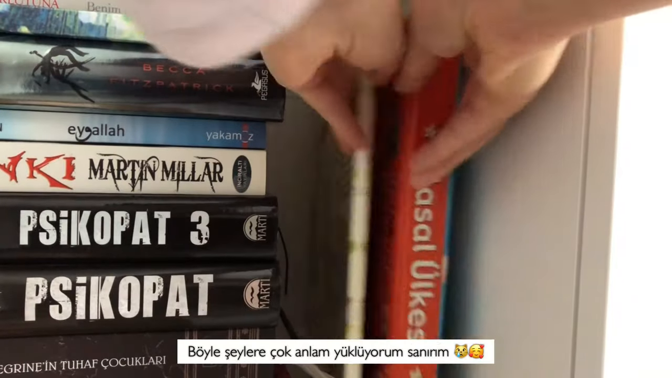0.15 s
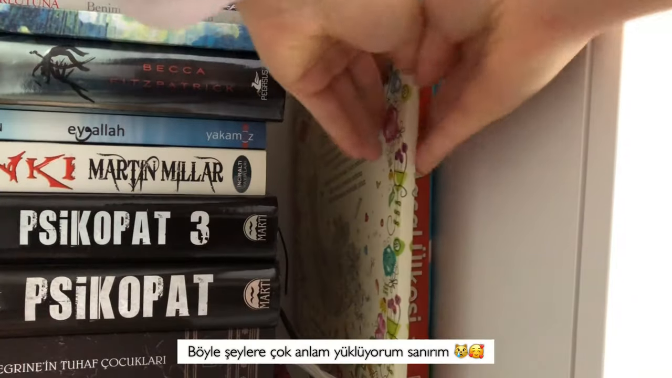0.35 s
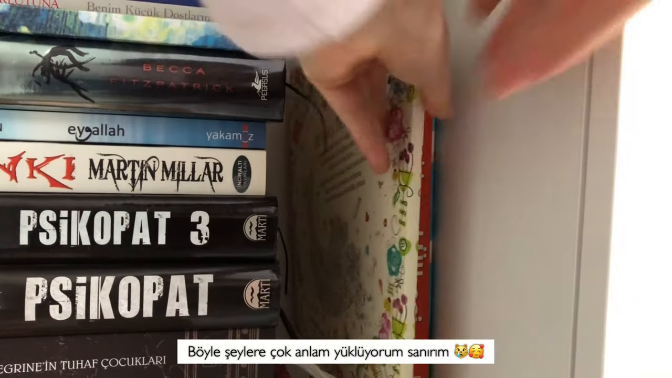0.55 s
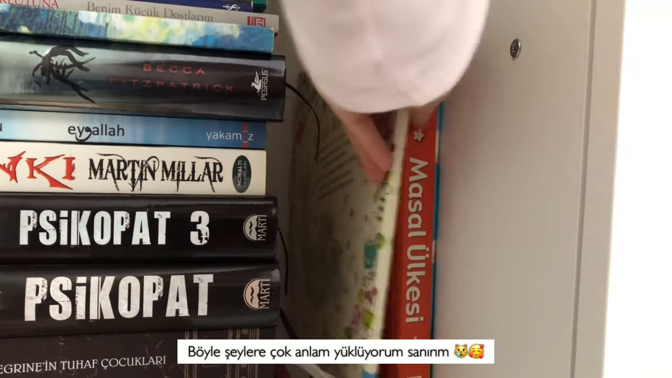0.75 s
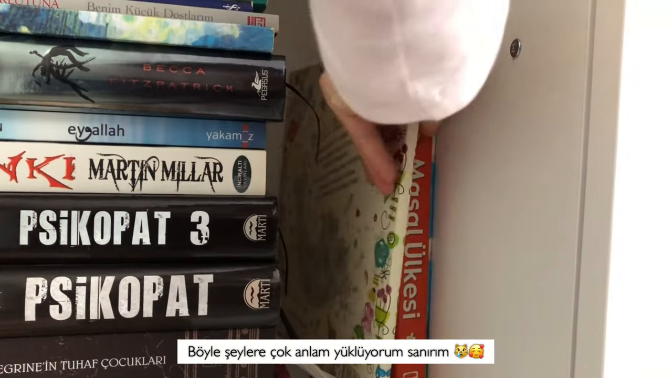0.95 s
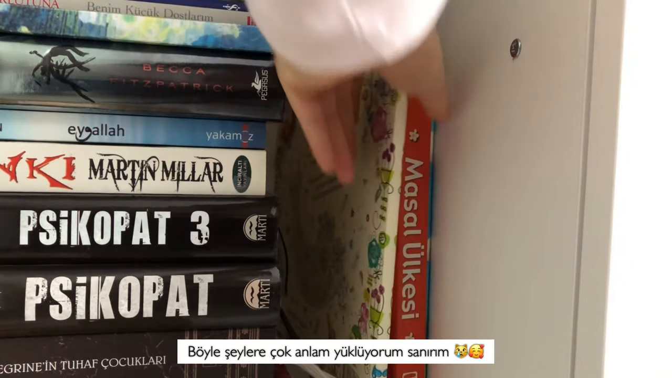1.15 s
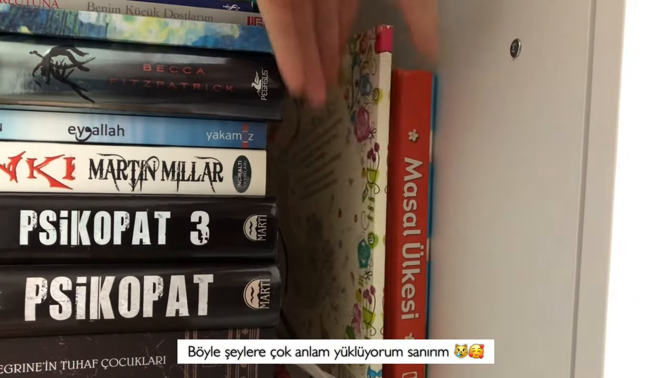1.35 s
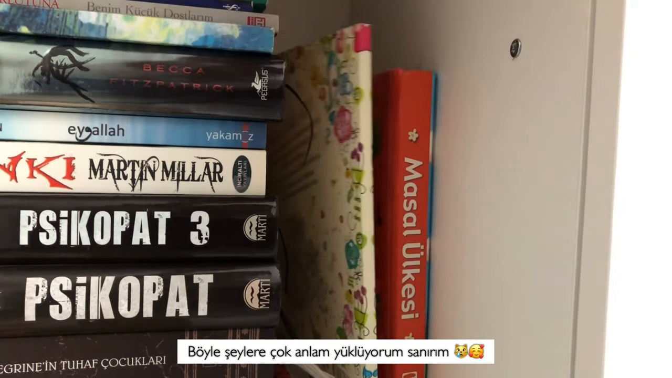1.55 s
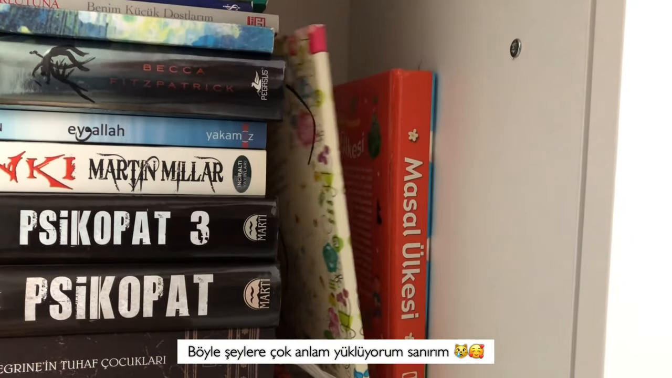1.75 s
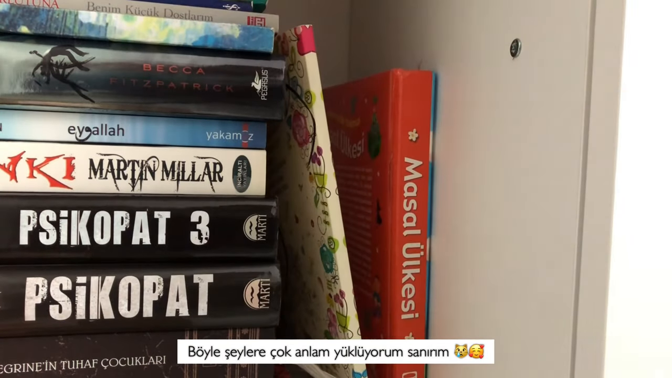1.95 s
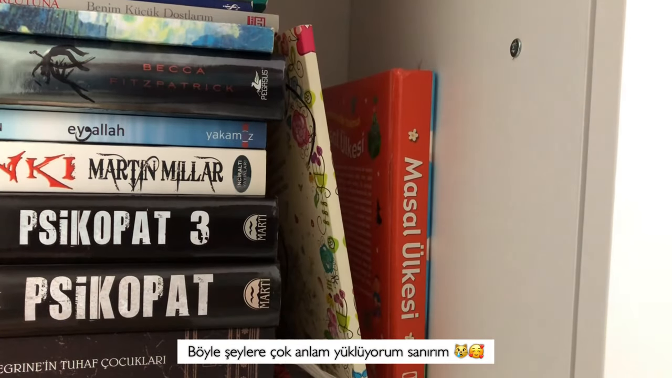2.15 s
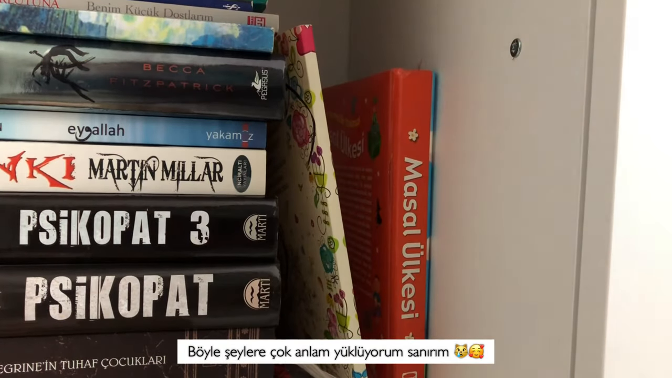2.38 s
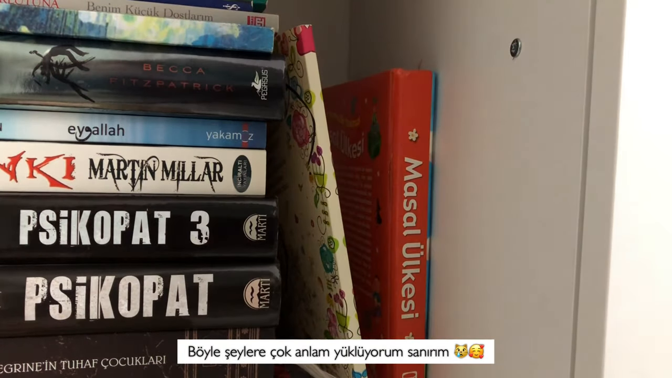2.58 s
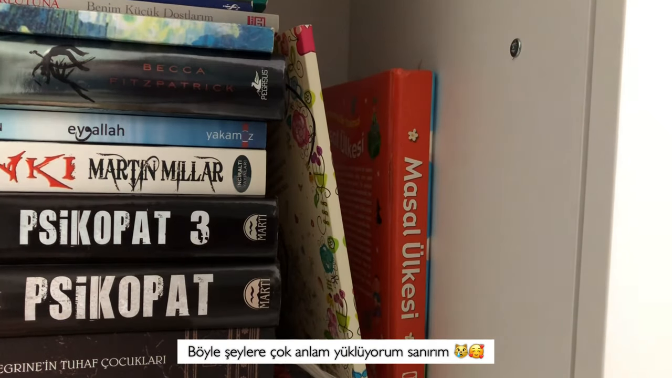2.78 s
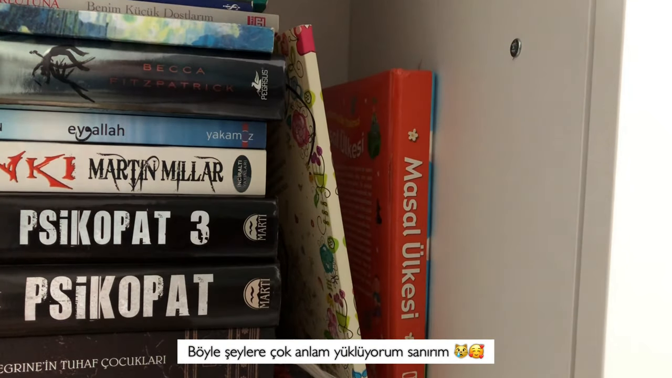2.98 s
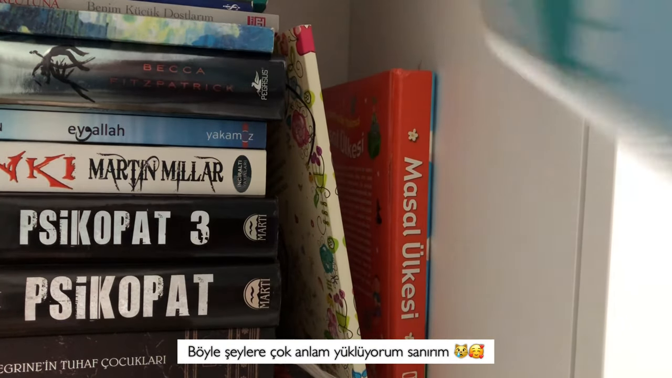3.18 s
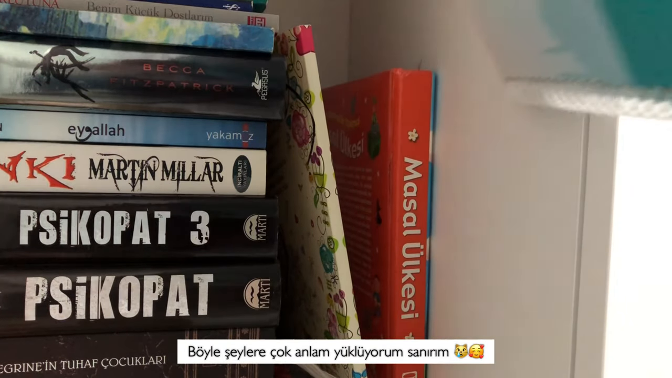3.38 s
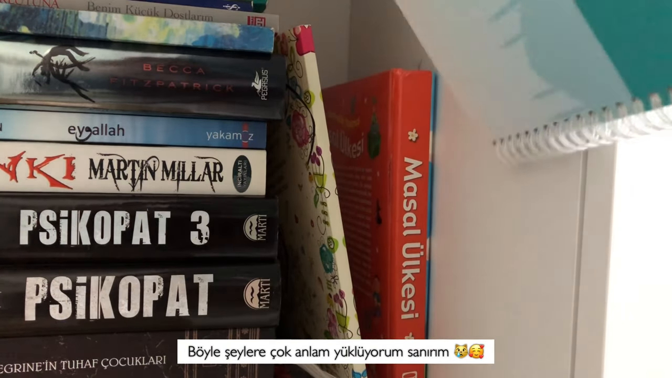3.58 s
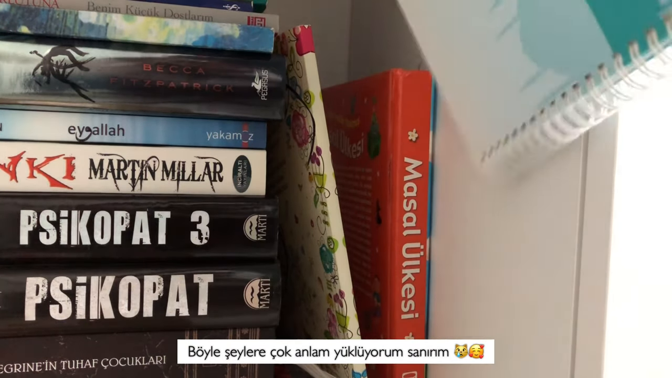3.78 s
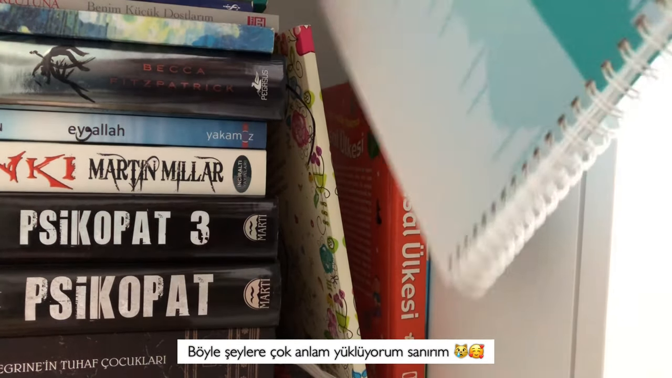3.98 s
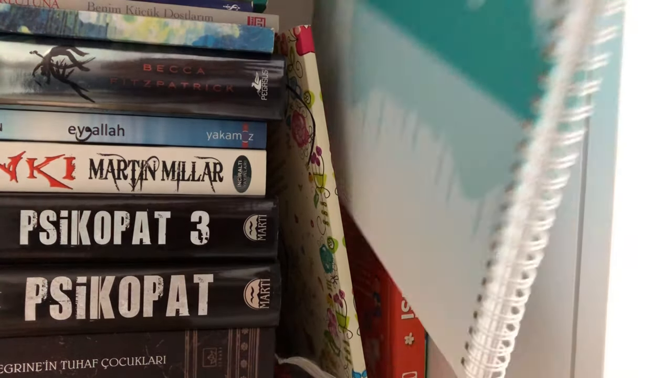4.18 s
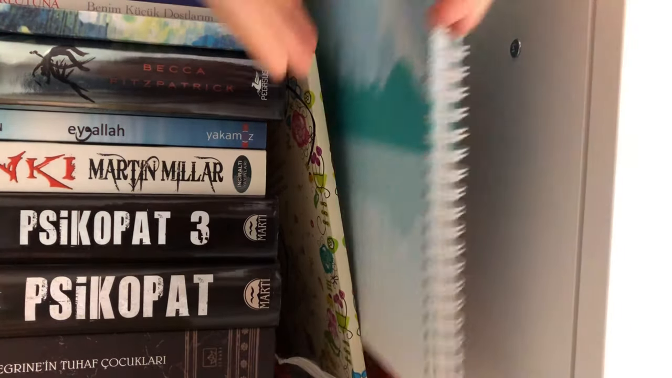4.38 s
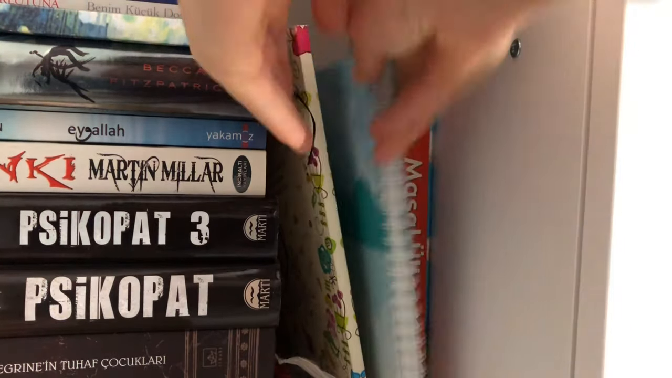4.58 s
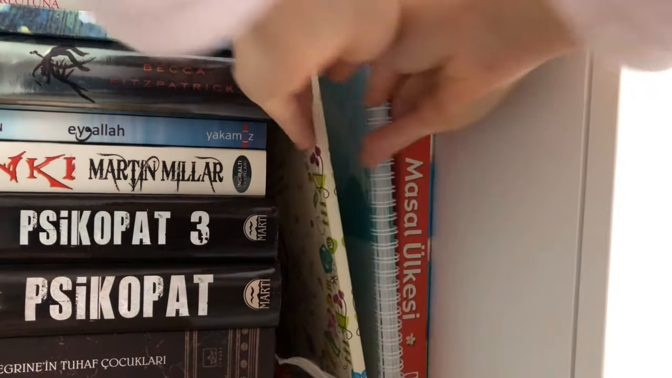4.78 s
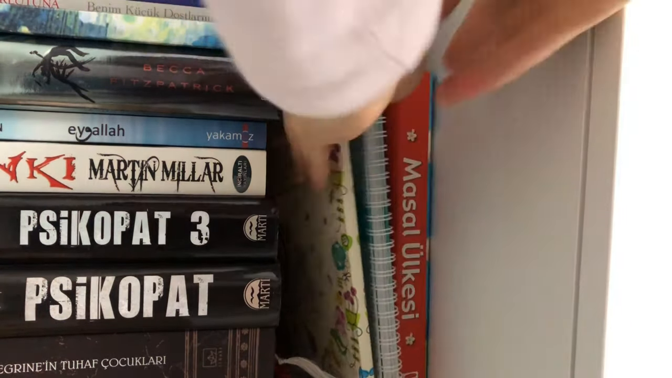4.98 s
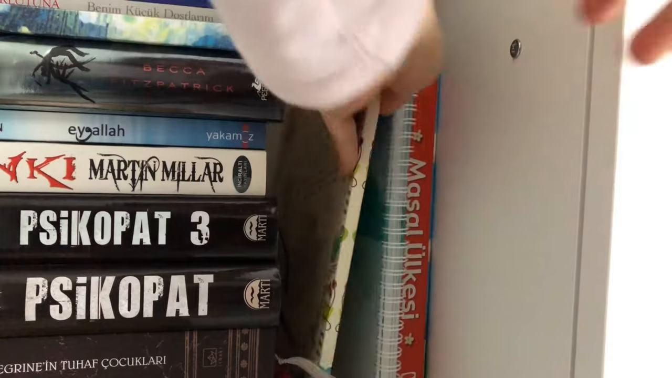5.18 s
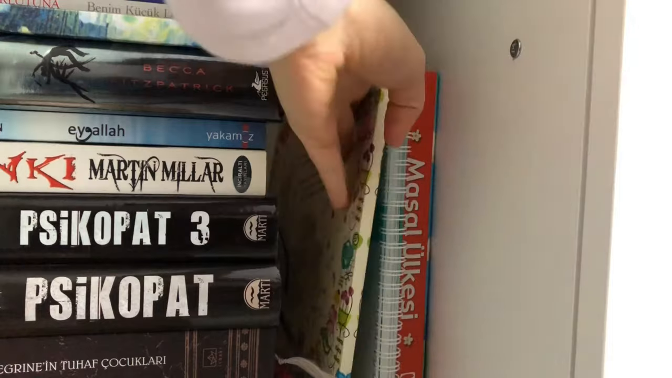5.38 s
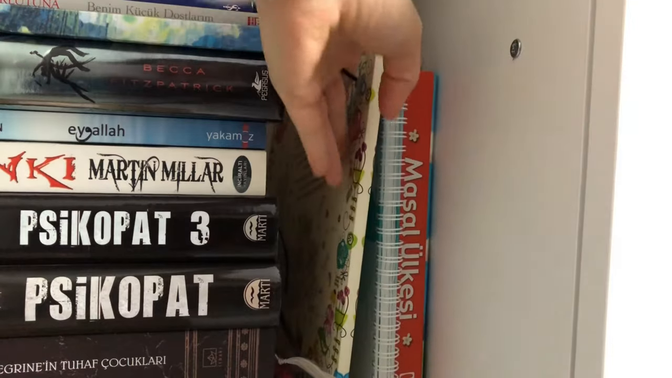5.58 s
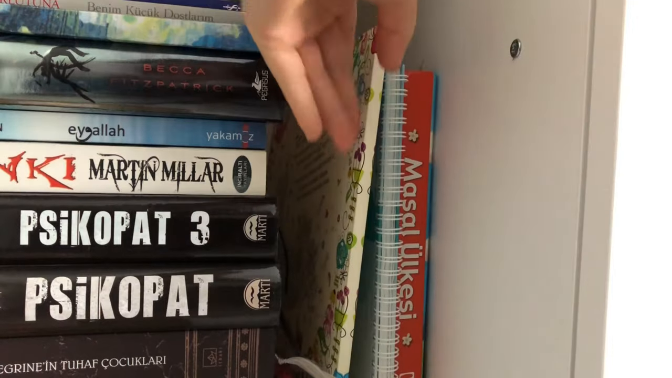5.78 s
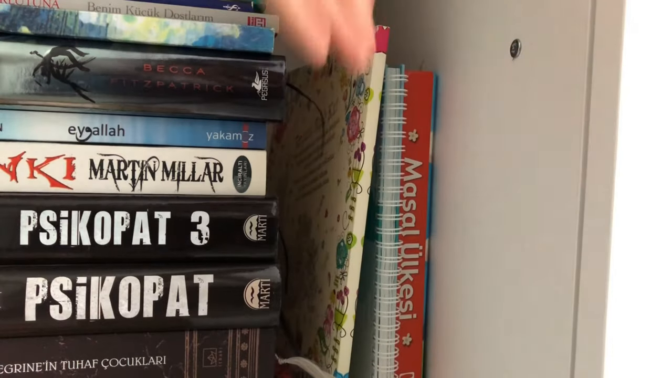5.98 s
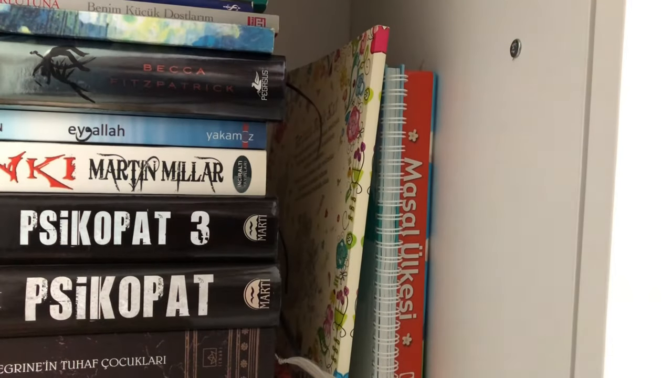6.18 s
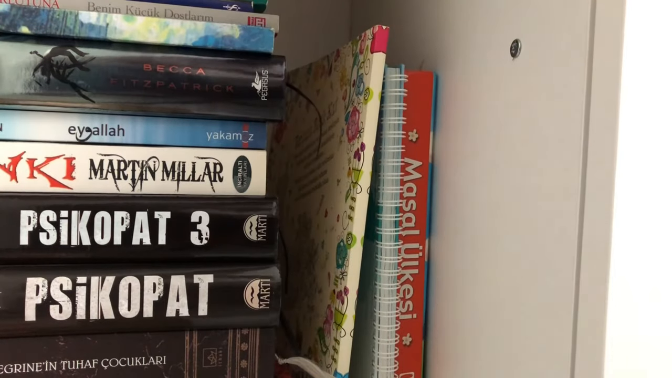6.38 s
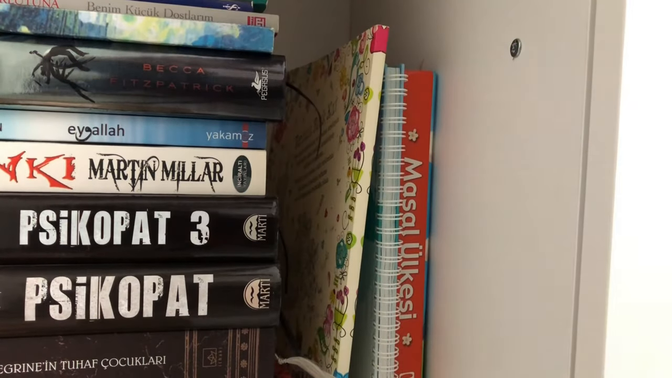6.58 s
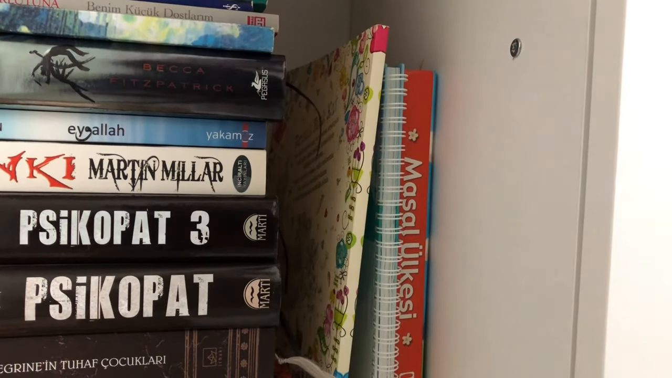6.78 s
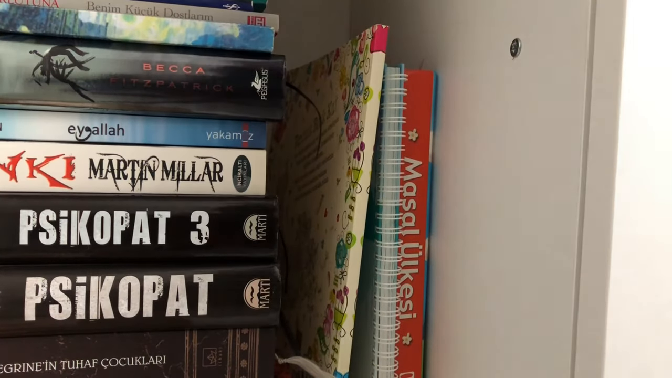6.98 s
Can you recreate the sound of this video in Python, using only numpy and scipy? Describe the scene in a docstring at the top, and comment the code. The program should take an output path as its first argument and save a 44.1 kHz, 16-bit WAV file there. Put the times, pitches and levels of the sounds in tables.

```python
"""Two picture books and a wire-bound notebook are pushed into a wooden bookcase, close by in a small room.
First glossy covers slide and crackle, fingers tick on card and book edges knock on the boards.
Just after 3 s the wire binding shimmers and clicks against the side wall. At 4.5 s the notebook drops
onto the shelf with three blows that overload the microphone. Lighter knocks and a flurry of ticks follow,
then soft slides and one last brush of a cover, over the low background of the home."""
import sys
import numpy as np
from scipy import signal
from scipy.fft import rfft, irfft
from scipy.io import wavfile

SR = 44100
rng = np.random.default_rng(int(sys.argv[2]) if len(sys.argv) > 2 else 0)


def transcribe(signal):
    """Save signal, clipped to [-1, 1], as a 16-bit WAV file at the path in sys.argv[1]."""
    frames = np.atleast_2d(signal).T
    limited = np.clip(frames, -1, 1)
    pcm = np.round(limited * 32767).astype(np.int16)
    wavfile.write(sys.argv[1], SR, pcm)


N = 310464
TIME = np.arange(N) / SR
AGE = TIME[:SR]  # seconds since a contact


def undb(db):
    """Decibels to gain."""
    return 10 ** (np.asarray(db) / 20)


def unit(x):
    """Scale to rms 1."""
    return x / np.sqrt(np.mean(x ** 2))


def on_log_axis(hz, points):
    """Read (freq_hz, value) points along a log-frequency axis."""
    freq_hz, value = np.transpose(points)
    return np.interp(np.log(hz + 1e-9), np.log(freq_hz), value)


def colour(x, eq):
    """Shape a steady signal with an EQ curve, at rms 1."""
    gain = undb(on_log_axis(np.fft.rfftfreq(len(x), 1 / SR), eq))
    return unit(irfft(rfft(x) * gain, len(x)))


def noise(eq, length=SR):
    """Noise shaped by an EQ curve, at rms 1."""
    return colour(rng.standard_normal(length), eq)


def resonate(x, hz, width_hz):
    """Two-pole band-pass, gain 1 at the centre."""
    hz, width_hz = min(hz, SR * .45), min(width_hz, SR * .4)
    return signal.lfilter(*signal.iirpeak(hz, hz / width_hz, SR), x)


def fade(t60_s):
    """Exponential decay from a contact."""
    return np.exp(-np.log(1000) * AGE / t60_s)


def ring(hz, t60_s):
    """One struck mode."""
    return np.sin(2 * np.pi * hz * AGE) * fade(t60_s)


def add(out, start_s, sound):
    """Mix a sound in at a time."""
    start = int(np.clip(start_s * SR, 0, N - 1))
    out[start:start + len(sound)] += sound[:N - start]


def wander(rate_hz):
    """Smooth random drift, spread near 1."""
    points = rng.standard_normal(N // 100)
    return np.interp(TIME * rate_hz, np.arange(len(points)), points)


# Modes of the bookcase: pitch_hz, level_db, t60_s
SHELF_MODES = [(142.8, 1.5, 0.22), (183.4, 1.5, 0.15), (233, -16.5, 0.4), (276.8, -4, 0.14),
               (329.3, 0.5, 0.15), (398, -3.5, 0.14), (535, 2, 0.036), (540.7, -6, 0.15),
               (598.7, 0.5, 0.08), (725, 0, 0.041), (792, -11, 0.12), (914, -16, 0.037),
               (1130, -6.5, 0.047), (1286, -13, 0.034), (1390, -17, 0.16)]
# Tone of clacking covers: freq_hz, gain_db
CLACK_EQ = [(100, 1.5), (300, 13.5), (650, 8.5), (1100, 2.5), (1500, 2.5), (2100, -9), (3000, -6.5),
            (6000, -23.5), (14000, -22)]
# Tone of the booming case: freq_hz, gain_db
BOOM_EQ = [(20, -25.5), (40, -24), (65, 5.5), (100, -4.5), (150, -11), (250, -15.5), (500, -24),
           (2000, -84)]
# Book edges hitting the boards: start_s, level_db, pitch_hz, clack_db, shelf_ring_db
BOOK_KNOCKS = [(.081,-21.5,336,-27,2.5), (.142,-4,214,-51,-2), (.164,-22,220,-22,-3),
               (0.205,-2.5,170,-31,-34), (.276,-22,300,-28.5,-7), (0.308,-13.5,164,-51,-7),
               (0.781,-15.5,182,-55,-14.5), (0.8249,-7.5,656,-29.5,-26), (.826,-5.5,158,-38,-7.5),
               (.858,-7.5,83.4,-54,-10), (.924,-16,152,-47,-15), (1.6,-26,510,-55,-4.5),
               (1.798,-28.5,149,-41,-1.5), (2.025,-11.5,684,-41.5,-30), (2.037,-25.5,560,-46,-12),
               (2.085,-26,680,-46.5,-21), (3.0741,-4.5,545,-32,-21), (3.076,6,207,-27,-20),
               (3.186,-15.5,228,-27.5,-6), (3.711,-14,199,-36,-12.5), (3.737,-23,323,-34,-4),
               (3.78,-8,278,-34,-8), (3.861,-27,336,-30,1.5), (3.873,-18.5,404,-30,-4),
               (3.892,1.5,193,-25.5,-7), (3.957,-16,210,-33.5,-6.5), (4.396,-39,615,-30.5,-6),
               (4.5081,14,204.7,-4.5,-8), (4.533,0,200,-31.5,-1), (4.6204,9,616,-10.5,-4),
               (4.631,1.5,206,-25,-8), (4.657,-4,318,-37.5,-5), (4.7119,7,230,-12,-7),
               (4.7555,-6.5,456,-23.5,-4.5), (5.146,-21.5,338,-21.5,-4), (5.159,-12,267,-22.5,-2),
               (5.178,-16,296,-26.5,-6), (5.208,-1.5,201,-32,-12.5), (5.259,-10,146,-31,-19),
               (5.299,-19,149,-34,-2), (6.959,-21,600,-37,-8)]
def knocks(book_hz=200, book_t60_s=.055, push_s=.0021, boom_rise_s=.016, boom_limit_db=-11):
    """Each blow rings the book and the shelf; the covers clack and the whole case booms a little later."""
    out = np.zeros(N)
    low_cut = signal.butter(2, 62, "high", fs=SR)  # a small board radiates little deep bass
    for start_s, level_db, pitch_hz, clack_db, shelf_ring_db in BOOK_KNOCKS:
        t60_s = book_t60_s * (book_hz / pitch_hz) ** .48  # higher rings die sooner
        book = ring(pitch_hz, t60_s) * (1 - np.exp(-AGE / push_s))
        shelf = 0
        for k, (mode_hz, mode_db, mode_t60_s) in enumerate(SHELF_MODES):
            # a soft, low blow stays in contact too long to reach the high modes
            drive = min(mode_hz / pitch_hz, 1) / (1 + (mode_hz / (2.3 * pitch_hz)) ** 2)
            shelf += (-1) ** k * undb(mode_db) * drive * ring(mode_hz, mode_t60_s)
        wood = undb(level_db) * signal.lfilter(*low_cut, book + undb(shelf_ring_db - 3) * shelf)
        clack = undb(clack_db + 2.5) * noise(CLACK_EQ) * (fade(.061) + undb(4) * fade(.014))
        boom = noise(BOOM_EQ) * fade(.45) * (1 - np.exp(-AGE / boom_rise_s))
        # harder, lower blows boom more, up to the heavy case's limit
        boom_db = min(-21 + .74 * level_db - 4 * np.log2(pitch_hz / book_hz), boom_limit_db)
        add(out, start_s, bend(wood + clack, travel_s=.00906) + undb(boom_db) * boom)
    return out


def bend(x, travel_s, stiff_hz=1300):
    """Bending waves in a board: below stiff_hz the lows arrive late; travel_s is their trip at 100 Hz."""
    hz = np.minimum(np.fft.rfftfreq(2 * len(x), 1 / SR), stiff_hz)
    turns = 10 * travel_s * (2 * np.sqrt(hz) - hz / np.sqrt(stiff_hz))
    return irfft(rfft(x, 2 * len(x)) * np.exp(-2j * np.pi * turns))[:len(x)]


# Tone of sliding gloss: freq_hz, gain_db
HISS_EQ = [(800, -16), (2000, -2.5), (3500, 1.5), (5500, 1), (8000, -0.5), (11000, 2), (15000, 7)]
# Tone of rasping card: freq_hz, gain_db
RASP_EQ = [(100, 7.5), (250, 7), (450, 3), (650, 6), (950, 1.5), (1600, 2.5), (2800, -8), (5000, -23),
           (9000, -38.5)]
# Strokes of a cover or sleeve over a surface: peak_s, rise_s, fall_s, hiss_db, bright_db, rasp_db
COVER_STROKES = [(.12,0.33,0.12,-29.5,-4,-42.5), (.17,0.0088,0.046,-20.5,-4.5,-55),
                 (.25,.05,0.1,-27.5,-4,-39), (.54,0.065,0.12,-45.5,-2,-51.5), (.72,0.051,0.14,-32,-4,-43),
                 (.795,0.034,0.064,-28,-5,-37.5), (.9,0.024,0.025,-28.5,-5,-47),
                 (1.05,0.042,0.044,-33,1,-46.5), (1.16,0.011,0.028,-34,-5,-43),
                 (1.4,0.29,0.75,-53.5,-10,-49.5), (1.71,0.16,0.085,-40,-4,-41),
                 (1.91,0.064,0.037,-49,-9,-40.5), (2.035,0.0061,0.047,-38.5,-1,-48),
                 (2.142,0.0088,0.013,-31.5,-7,-41), (2.2,0.073,0.087,-43,-2,-51),
                 (2.31,0.06,0.063,-32.5,-9,-40.5), (2.45,0.19,0.15,-58,-13,-50),
                 (3.145,0.028,0.029,-34.5,-10,-33), (3.55,0.027,0.11,-47,-10,-46),
                 (3.665,.03,0.015,-38,-8,-40), (3.785,.085,0.065,-31.5,-0.5,-38.5),
                 (3.95,0.12,0.15,-38.5,-7,-44.5), (4.35,0.043,0.064,-40,-7.5,-55),
                 (4.42,0.013,.045,-27,1.5,-32.5), (4.6,0.12,0.14,-33.5,-1,-30),
                 (4.83,0.05,0.039,-31,-13,-36), (5.0,0.38,0.45,-35,-5.5,-41.5),
                 (5.155,0.015,0.032,-26.5,2,-30), (5.28,0.023,0.063,-40,6,-46),
                 (5.52,0.069,0.039,-36,-7,-47), (5.98,.27,0.34,-47.5,-7,-57.5), (6.32,.1,0.1,-42.5,-21,-51),
                 (6.57,0.15,0.11,-40,-1,-53), (6.9,0.23,.2,-51.5,-8,-52.5),
                 (6.975,0.017,0.072,-38.5,-16,-47), (7.033,0.0053,.04,-17.5,-17,-60)]
def sliding(gain_db=1, split_hz=8500, resting_hiss_db=-59, resting_rasp_db=-66):
    """Glossy covers hiss as they slide, brighter when they barely touch; under pressure the card rasps."""
    dull_power, bright_power = undb(resting_hiss_db) ** 2, 0
    rasp_power = undb(resting_rasp_db) ** 2
    for peak_s, rise_s, fall_s, hiss_db, bright_db, rasp_db in COVER_STROKES:
        power = swell(peak_s, rise_s, fall_s) ** 2
        tilt = undb(bright_db) ** 2
        surface_power = power * undb(hiss_db) ** 2 * 2 / (1 + tilt)
        dull_power += surface_power
        bright_power += tilt * surface_power
        rasp_power += power * undb(rasp_db) ** 2
    gloss = colour(friction(grain_db=-7.5, catches_per_s=830, grip_db=2.5), HISS_EQ)
    hiss = moving_contact(gloss)
    dull = signal.sosfiltfilt(signal.butter(2, split_hz, fs=SR, output="sos"), hiss)
    bright = hiss - dull
    rasp = colour(friction(grain_db=-8, catches_per_s=300, grip_db=4), RASP_EQ)
    mix = np.sqrt(dull_power) * dull + np.sqrt(bright_power) * bright + np.sqrt(rasp_power) * rasp
    return undb(gain_db) * mix


def swell(peak_s, rise_s, fall_s, edge_db=-9, roundness=1.35):
    """Envelope of one hand movement: it speeds up, peaks and slows down."""
    away = np.maximum((peak_s - TIME) / rise_s, (TIME - peak_s) / fall_s)
    return np.where(away < 4, undb(edge_db * away ** roundness), 0)


def friction(grain_db, catches_per_s, grip_db):
    """Countless tiny slips, a few of them much larger, under a wavering grip."""
    smooth = rng.standard_normal(N)
    catches = (rng.random(N) < catches_per_s / SR) * rng.standard_normal(N)
    catches *= undb(2.9 * np.minimum(rng.exponential(size=N), 4))
    return (smooth + undb(grain_db) * unit(catches)) * undb(grip_db * wander(70))


def moving_contact(hiss, bands_hz=(2620, 4220, 6500, 9800), depth_db=2.5):
    """Resonances come and go in the hiss as the patch of contact moves."""
    shifts = sum(resonate(hiss, hz, .24 * hz) * (undb(depth_db * wander(16)) - 1) for hz in bands_hz)
    return unit(hiss + shifts)


# Fingers and card edges snapping: start_s, level_db, pitch_hz
CARD_TICKS = [(0.077,-16.5,4500), (0.164,-2.5,6000), (0.2147,-6.5,5500), (0.3534,-15.5,6760),
              (.431,-10,5860), (.713,-19.5,5000), (0.7887,-16,7000), (.7942,-10,7850), (0.9819,-17.5,6300),
              (1.042,-11,8100), (1.088,-17.5,6900), (1.1048,-13,12800), (1.1508,-10,10400),
              (1.2396,-18.5,9350), (1.331,-34,12300), (2.0275,-25,9000), (3.0727,-23,3120),
              (3.6886,-20.5,2930), (4.3962,-16.5,2180), (4.5076,5,2820), (4.612,-14,5470),
              (5.0643,-18,4770), (5.1431,-8,4280), (5.1576,-3.5,10000), (5.184,-11.5,5500),
              (5.378,-9.5,10600), (5.4065,-17.5,11000), (5.4287,-15,4050), (5.4522,-12,9300),
              (5.4761,-8.5,10200), (5.4803,-6,11100), (5.5062,-7.5,6700), (5.5357,-11,10430),
              (5.5443,-11,3030), (5.627,-27,11300), (5.865,-23.5,10630), (5.9227,-28,12270),
              (6.438,-24.5,2620)]
def ticks(gain_db=1, scratch_db=-12, rebound_db=-13, snap_hz=12800):
    """A card edge lets go with one sharp snap, a flutter of tiny rebounds and a brief scratch."""
    out = np.zeros(N)
    for start_s, level_db, pitch_hz in CARD_TICKS:
        scratch_t60_s = .02 * 5000 / pitch_hz  # smaller edges scratch for less time
        force = undb(scratch_db) * rng.standard_normal(SR) * fade(scratch_t60_s)
        force[0] = 2  # the edge lets go
        width_hz = 1.63 * pitch_hz
        card = resonate(resonate(force, pitch_hz, width_hz), pitch_hz, width_hz)
        rebounds = undb(rebound_db) * rng.standard_normal(SR) * fade(.005)
        snap = resonate(signal.unit_impulse(SR) + rebounds, snap_hz, width_hz=5500)
        snap_gain = undb(-3) * pitch_hz / snap_hz  # the smaller the edge, the more of it is pure snap
        tick = card / np.abs(card).max() + snap_gain * snap / snap.max()
        add(out, start_s, undb(level_db + gain_db) * tick)
    return out


# Resonances of wire and cover: pitch_hz, width_hz, level_db
BINDING_MODES = [(1280, 470, 15), (2340, 950, 9), (5600, 2500, 5.5), (6760, 470, 14.5), (7440, 260, -4),
                 (14500, 4100, 8)]
# The binding tapping the side wall: start_s, level_db
BINDING_TAPS = [(3.2968, -5), (3.3699, -19), (3.4963, -14.5)]
def wire_taps(tail_db=-23, wall_hz=107, wall_db=-13, clack_db=-17):
    """The wire loops chatter against the wall and ring on faintly; the wall answers with a soft knock."""
    out = np.zeros(N)
    for start_s, level_db in BINDING_TAPS:
        chatter = rng.standard_normal(SR) * (fade(.021) + undb(tail_db) * fade(.22))
        tap = sum(undb(db) * resonate(chatter, hz, width_hz) for hz, width_hz, db in BINDING_MODES)
        knock = undb(wall_db) * ring(wall_hz, .11)
        clack = undb(clack_db) * noise(CLACK_EQ) * fade(.088)
        wall = bend(knock + clack, travel_s=.0099)
        add(out, start_s, undb(level_db) * (tap / np.abs(tap).max() + wall))
    return out


# Glossy covers peeling apart: start_s, end_s, cracks_per_s, level_db
COVER_PEELS = [(.08, .378, 130, -17), (0.961, 1.139, 110, -20.5), (3.702, 3.822, 150, -21),
               (5.436, 5.56, 70, -17)]
def crackle(scatter_db=4, lowest_hz=3000, octaves=2.6, crack_t60_s=.00079):
    """Laminate clings and parts in tiny cracks of every size and pitch."""
    out = np.zeros(N)
    for start_s, end_s, cracks_per_s, level_db in COVER_PEELS:
        length_s = end_s - start_s
        for when, pitch, size in rng.random((int(cracks_per_s * length_s), 3)):
            crack = ring(lowest_hz * 2 ** (octaves * pitch), crack_t60_s)
            add(out, start_s + when * length_s, undb(level_db + scatter_db * (2 * size - .5)) * crack)
    return out


# Fingertips and card edges juddering over a cover: start_s, end_s, slips_per_s, level_db, pitch_hz
COVER_JUDDERS = [(0.245, 0.281, 116, -22, 1690), (0.872, 0.934, 62, -22.5, 1670),
                 (0.98, .995, 100, -29, 1550), (3.143, 3.157, 260, -22.5, 2560),
                 (4.411, 4.45, 126, -23.5, 1540)]
def judders(slip_t60_s=.01, jitter=.06, scatter_db=2):
    """The contact sticks and slips on the card; every slip rings the cover briefly."""
    out = np.zeros(N)
    for start_s, end_s, slips_per_s, level_db, pitch_hz in COVER_JUDDERS:
        for slip_s in np.arange(start_s, end_s, 1 / slips_per_s):
            late, size, detune = rng.standard_normal(3)
            slip = ring(pitch_hz * (1 + jitter * detune), slip_t60_s)
            add(out, slip_s + jitter * late / slips_per_s, undb(level_db + scatter_db * size) * slip)
    return out


# A leaning book shifting on the board: peak_s, rise_s, fall_s, level_db
BOOK_SHIFTS = [(2.41,0.022,0.049,-27), (2.56,0.048,0.095,-27.5)]
def rumble(body_hz=140, width_hz=220):
    """A book that shifts its weight makes the case grumble softly."""
    grumble = unit(resonate(noise(BOOM_EQ, N), body_hz, width_hz))
    return grumble * sum(undb(level_db) * swell(*timing) for *timing, level_db in BOOK_SHIFTS)


# Jolts to the wire coil: start_s, level_db
BINDING_JOLTS = [(3.076, -44), (3.14, -42.5), (3.298, -46), (3.497, -52)]
def coil_shimmer(pitch_hz=2750, width_hz=650, t60_s=.5):
    """The many close modes of the spiral binding shimmer after a jolt."""
    out = np.zeros(N)
    for start_s, level_db in BINDING_JOLTS:
        band = resonate(rng.standard_normal(SR), pitch_hz, width_hz)
        shimmer = unit(resonate(band, pitch_hz, width_hz))
        add(out, start_s, undb(level_db) * shimmer * fade(t60_s))
    return out


# Reverb time of the room: freq_hz, t60_s
ROOM_DECAY = [(70, 1), (200, 0.49), (600, 0.36), (2500, 0.39), (7000, 0.11), (15000, 0.42)]
def reverb(dry, wet_db=-15, build_s=.0049):
    """Diffuse reflections of a small furnished room; the bass lingers longest."""
    spectrum = rfft(rng.standard_normal(SR))
    octave = np.log2(np.maximum(np.fft.rfftfreq(SR, 1 / SR), 1))
    tail = np.zeros(SR)
    for centre in range(6, 15):  # octave bands, 64 Hz to 16 kHz
        band = irfft(spectrum * np.maximum(1 - np.abs(octave - centre), 0), SR)
        tail += band * fade(on_log_axis(2. ** centre, ROOM_DECAY))
    tail *= 1 - np.exp(-AGE / build_s)
    return undb(wet_db) * signal.fftconvolve(dry, tail / np.linalg.norm(tail))[:N]


# Tone of the background: freq_hz, gain_db
ROOM_TONE_EQ = [(15, -60), (25, -27.5), (45, -8.5), (69, -4), (173, -15), (297, -19.5), (469, -27),
                (703, -24.5), (919, -32), (15500, -50)]
def room_tone(level_db=-45.5, swell_db=2.5):
    """The low, gently swelling background of the home."""
    return noise(ROOM_TONE_EQ, N) * undb(level_db + swell_db * wander(7.2))


def scene():
    """The close handling sounds and their reverb over a bed of room tone, in mono."""
    close = knocks() + wire_taps() + coil_shimmer() + ticks() + judders() + crackle()
    close = close + sliding() + rumble()
    return (close + reverb(close) + room_tone())[None]


def record(dry, top_hz=15900):
    """The hardest blows overload the microphone and clip flat; a steep low-pass cuts the top."""
    top_cut = signal.ellip(11, .02, 70, top_hz, fs=SR, output="sos")
    return signal.sosfilt(top_cut, np.clip(dry, -1, 1))


dry = scene()
out = record(dry)
transcribe(out)
```